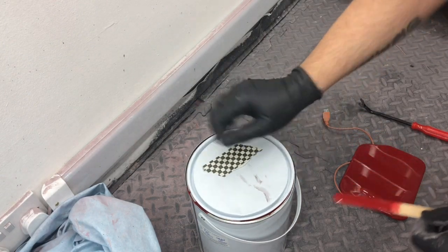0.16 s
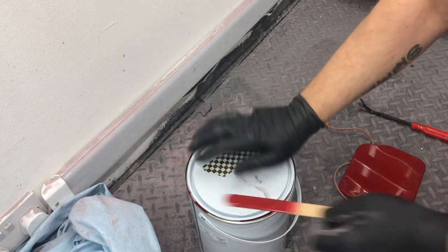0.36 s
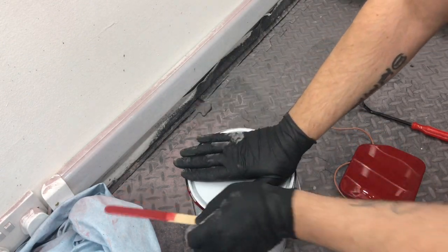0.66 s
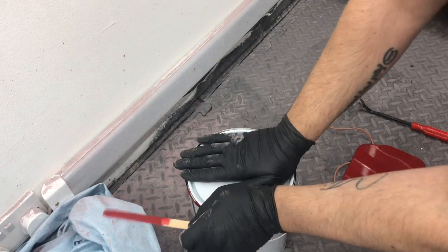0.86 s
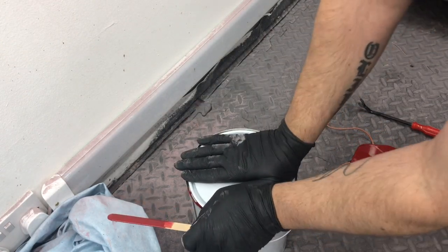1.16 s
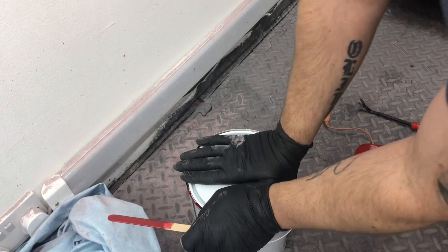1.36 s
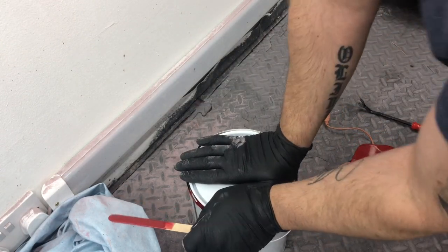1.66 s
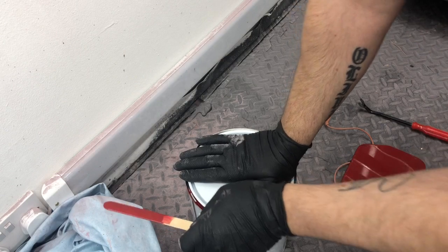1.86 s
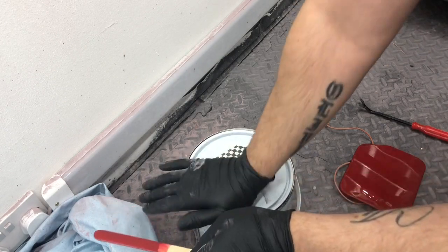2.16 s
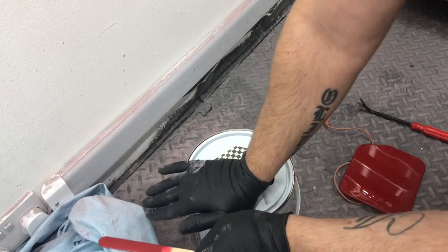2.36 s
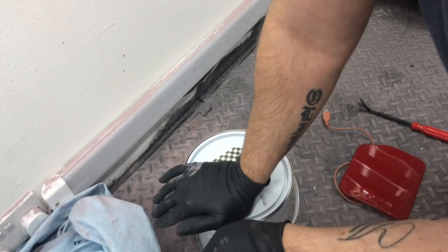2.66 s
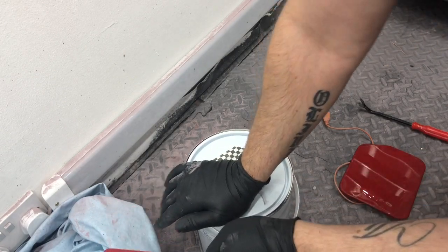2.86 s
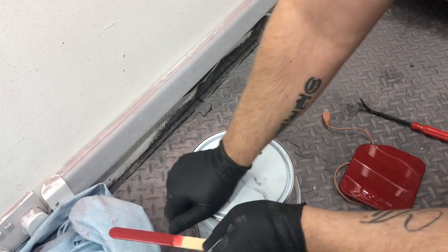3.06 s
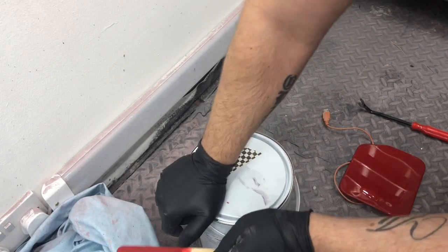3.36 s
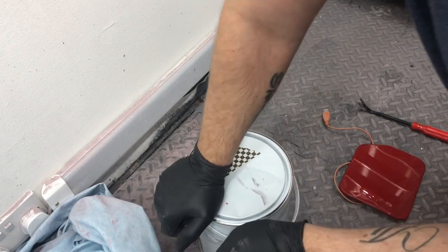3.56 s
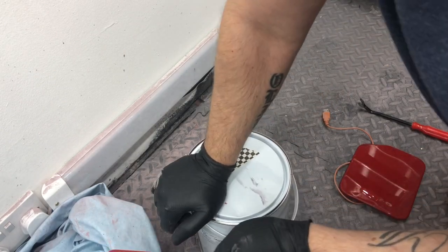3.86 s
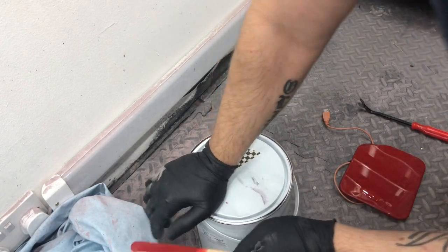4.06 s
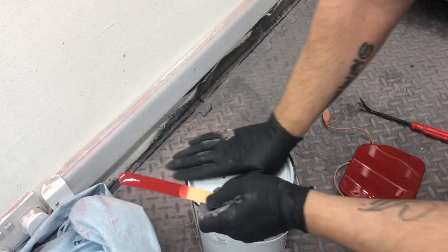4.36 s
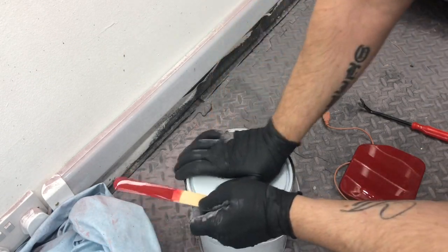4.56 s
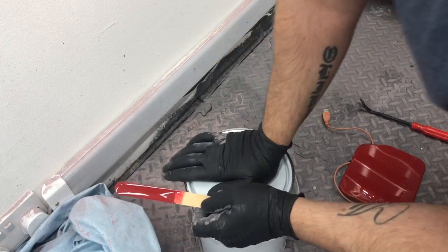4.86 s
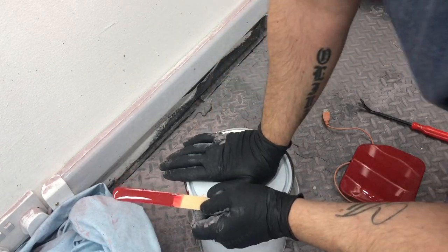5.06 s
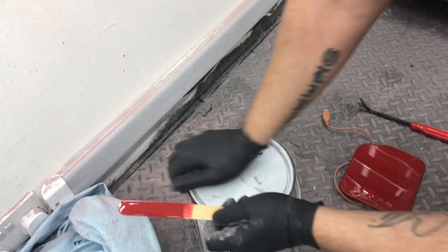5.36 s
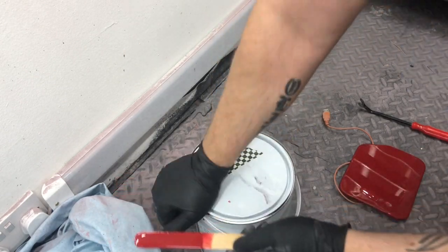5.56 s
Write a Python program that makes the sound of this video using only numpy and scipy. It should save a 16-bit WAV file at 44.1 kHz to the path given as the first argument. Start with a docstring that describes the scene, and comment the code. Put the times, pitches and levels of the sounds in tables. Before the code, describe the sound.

Close above a full paint tin on a garage floor, a rubber-gloved hand rubs and presses the lid. One sharp click-like knock comes early, then faint ticks and scuffs, a couple of dull double thumps, one loudest metallic bang, and lighter taps with squeaky rubbing. Short room echo, low hum and quiet steady noise beneath.

```python
"""Pressing home a paint tin lid

A gloved hand knocks and presses the lid of a full paint tin home on a garage floor.
Blows and light taps ring damped modes; dense random taps make chatter and faint tails after the blows.
Short grainy noise bursts make slips of the lip and small ticks of the glove, which also rubs as rasp and
hiss and squeaks as rough tones; the seal whistles faintly as wavering tones.
A low hum and steady room noise lie underneath; the garage echoes blows, chatter, bursts and squeaks.
"""
import sys
import numpy as np
from scipy import signal
from scipy.fft import rfft, irfft
from scipy.io import wavfile
from scipy.ndimage import uniform_filter1d

SR = 44100
rng = np.random.default_rng(int(sys.argv[2]) if len(sys.argv) > 2 else 0)


def int16_out(signal):
    """Quantize to a 16-bit WAV file."""
    q = np.round(np.clip(np.atleast_2d(signal).T, -1, 1) * 32767)
    wavfile.write(sys.argv[1], SR, q.astype(np.int16))


N = 251811  # length [samples]
T = np.arange(N) / SR  # time [s]


def from_db(db):
    """Decibels to gain."""
    return 10 ** (np.asarray(db) / 20)


def rms_one(x):
    """The same sound at unit RMS level."""
    return x / np.sqrt(np.mean(x ** 2) + 1e-20)


def in_time(rows):
    """Each column of an automation curve, read at every sample."""
    s, *columns = np.transpose(rows)
    return [np.interp(T, s, column) for column in columns]


def at_hz(points, hz):
    """Read a table on a log-frequency axis."""
    f, value = np.transpose(points)
    return np.interp(np.log(np.maximum(hz, 1)), np.log(f), value)


def coloured(x, spectrum):
    """Equalise a sound with a drawn spectrum; unit level."""
    freqs = np.fft.rfftfreq(len(x), 1 / SR)
    gain = from_db(at_hz(spectrum, freqs))
    return rms_one(irfft(rfft(x) * gain, len(x)))


def cut(x, hz, kind="low", order=2):
    """Butterworth filter."""
    return signal.sosfilt(signal.butter(order, hz, kind, fs=SR, output="sos"), x)


def drift(per_s):
    """Random control curve: normal draws of spread 1, per_s of them a second, joined by lines."""
    knots = rng.standard_normal(int(per_s * N / SR) + 2)
    return np.interp(T * per_s, np.arange(len(knots)), knots)


def add(out, s, sound):
    """Mix a sound in at a time, trimmed at the end of the scene."""
    start = round(s * SR)
    out[start:start + len(sound)] += sound[:N - start]


# low hum of the garage before trims: (time [s], level [dB], level of its octave [dB])
HUM_LEVELS = [(0.0, -56.5, -60), (.55, -57, -64), (.8, -80, -54), (2.25, -77, -51.5), (2.6, -54.5, -56),
              (2.93, -45.5, -69), (3.4, -58.5, -56.5), (5.7, -71, -58)]
# tone colour of the steady room noise: (frequency [Hz], relative level [dB])
AIR_SPECTRUM = [(15, -83), (25, -40), (39, -14), (63, -3), (92, -12), (127, -17), (149, -15.5), (236, -20),
                (270, -18.5), (405, -21.5), (600, -24), (1000, -21.5), (1450, -24), (2000, -29.5),
                (16000, -58)]
HUM_HZ, HUM_PHASE_DRIFT_PER_S = 57.7, 12
AIR_DB = -53


def background(hum_trim_db=-1, octave_trim_db=-4, flutter_db=3.5):
    """Steady coloured noise, and a hum and its octave that waver in phase and level."""
    hum_db, octave_db = in_time(HUM_LEVELS)
    phase = 2 * np.pi * HUM_HZ * T + drift(HUM_PHASE_DRIFT_PER_S)
    hum = rms_one(np.sin(phase) * from_db(flutter_db * drift(9.7)))
    octave = rms_one(np.sin(2 * phase) * from_db(flutter_db * drift(15.0)))
    air = from_db(AIR_DB) * coloured(rng.standard_normal(N), AIR_SPECTRUM)
    return from_db(hum_db + hum_trim_db) * hum + from_db(octave_db + octave_trim_db) * octave + air


# broad, quickly damped resonances of the rim: (frequency [Hz], width [Hz], level [dB])
RIM_RESONANCES = [(938, 570, 4.5), (1390, 880, 2.5), (1736, 162, 5), (2480, 540, 1.5), (2850, 375, 3.5),
                  (3114, 370, 2.5), (3930, 420, 2.5), (4870, 410, 1), (5320, 490, 1.5), (6800, 700, -0.5),
                  (8060, 720, -0.5), (9050, 1200, -0.5), (11600, 5000, -6), (15300, 1500, -1.5)]


def rim(x):
    """Pass a force through the rim: parallel resonators of alternating sign."""
    out = np.zeros(len(x))
    for k, (hz, width, db) in enumerate(RIM_RESONANCES):
        resonator = signal.iirpeak(hz, hz / width, fs=SR)
        out += (-1) ** k * from_db(db) * signal.lfilter(*resonator, x)
    return out


STROKE_CREST = 0.34  # the hand is fastest at this share of a stroke


def stroke(start, length):
    """Speed of the hand: it gathers, crests at 1 and comes to rest."""
    rise = np.interp(T, [start, start + STROKE_CREST * length, start + length], [0, 1, 0])
    return np.sin(np.pi / 2 * rise)


def patchy(x, depth_db, per_s):
    """Each third of an octave swells and fades on its own above a steady low end; unit level."""
    edges = np.geomspace(1000, 17000, 13)
    out = cut(x, edges[0])
    for band in zip(edges, edges[1:]):
        out += cut(x, band, "band", order=1) * from_db(depth_db * drift(per_s))
    return rms_one(out)


# strokes of the glove over the lid, levels at the crest:
# (start [s], length [s], rasp [dB], hiss [dB], fine top against the hiss [dB])
GLOVE_STROKES = [(0.247, 0.76, -74, -68.5, -3.5), (0.65, 2.9, -72, -69.5, -13),
                 (2.107, 0.13, -57, -59.5, -14), (2.223, 1.17, -77, -61.5, -22),
                 (2.913, 0.42, -62.5, -68, -5), (4.325, 0.15, -63, -65, 5),
                 (4.428, 0.36, -62.5, -58.5, -2.5), (4.492, 0.35, -61, -59.5, -1),
                 (5.097, 0.26, -63, -69.5, -3), (5.309, 0.11, -60, -57.5, -2), (5.412, 0.25, -62, -71, 2)]
# tone colour of the sliding rubber: (frequency [Hz], relative level [dB])
HISS_SPECTRUM = [(1500, 6.5), (3500, -12.5), (5500, -0.5), (8000, -5.5), (11000, -9), (16000, -13.5)]
RESTING_RASP_DB, RESTING_HISS_DB = -88, -77  # a hand at rest still creeps
RASP_LOW_HZ, RASP_HIGH_HZ = 2200, 4970
SHEEN_HZ = 9700  # a fast, flat palm adds a fine top to the hiss above this


def glove(catch_db=1.0, patch_db=6.0, patches_per_s=70, scuff_db=-0.05, grain_db=5):
    """Rubber catches and lets go: a grainy rasp in the rim under a hiss whose colour keeps shifting."""
    rasp_gain, hiss_gain, sheen_gain = from_db(RESTING_RASP_DB), from_db(RESTING_HISS_DB), 0
    for start, length, rasp_db, hiss_db, sheen_db in GLOVE_STROKES:
        speed = stroke(start, length)
        # overlapping strokes add in power
        rasp_gain = np.hypot(rasp_gain, speed * from_db(rasp_db))
        hiss_gain = np.hypot(hiss_gain, speed * from_db(hiss_db))
        sheen_gain = np.hypot(sheen_gain, speed * from_db(hiss_db + sheen_db))
    jolt_noise, hiss_noise, sheen_noise, grain = rng.standard_normal((4, N))
    jolts = jolt_noise * from_db(grain_db * grain)
    jolts = cut(jolts, RASP_LOW_HZ, "high", order=1)
    jolts = cut(jolts, RASP_HIGH_HZ, order=4)
    rasp = rasp_gain * rms_one(rim(jolts)) * from_db(catch_db * drift(150))
    hiss = hiss_gain * patchy(coloured(hiss_noise, HISS_SPECTRUM), patch_db, patches_per_s)
    sheen = sheen_gain * rms_one(cut(sheen_noise, SHEEN_HZ, "high", order=3))
    return (rasp + hiss + sheen) * from_db(scuff_db * drift(46))


# slips of the lip and small ticks of the glove, level before the rim:
# (time of peak [s], level [dB], fade time constant [s], low-pass cut-off [Hz])
SLIPS_AND_TICKS = [(0.564, -51.5, 0.0028, 12000), (0.585, -42.5, 0.0016, 14200), (.801, -45.5, 0.001, 4940),
                   (1.6024, -18.5, 0.0023, 12000), (1.933, -44, 0.006, 7060), (1.943, -43, 0.0039, 9100),
                   (1.978, -54, 0.015, 14100), (2.021, -45, 0.0046, 14000), (2.275, -49.5, 0.0016, 8000),
                   (2.329, -49.5, 0.0025, 9100), (2.397, -48, 0.0025, 8050), (2.459, -56, 0.0014, 9000),
                   (2.535, -47, 0.002, 5000), (2.562, -48, 0.002, 5000), (2.624, -46, 0.0016, 7000),
                   (2.5045, -41, 0.0011, 7000), (2.678, -30.5, 0.0013, 5900), (3.049, -42.5, 0.0037, 5060),
                   (3.062, -42.5, 0.0021, 5000), (3.198, -43.5, 0.0019, 11600),
                   (3.595, -24.5, 0.0062, 10200), (3.724, -29, 0.0021, 11900), (4.1221, -20, 0.0039, 3200),
                   (4.181, -55, 0.016, 14000), (4.323, -55.5, 0.0057, 13000), (4.341, -48, 0.0025, 6000),
                   (4.35, -46, 0.0023, 6000), (4.367, -58, 0.0044, 10000), (4.474, -41.5, 0.047, 2470),
                   (4.831, -42, 0.0013, 14200), (4.8743, -38, 0.0026, 13000), (4.885, -37.5, 0.0015, 12300),
                   (4.9432, -19, 0.0016, 12500), (5.0566, -34.5, 0.0011, 4740), (5.285, -43, 0.0019, 12500)]
BURST_SWELL = 0.47  # a burst builds up in this share of its fade


def slips_and_ticks(grain_db=3.0, rim_db=6):
    """Slips of the lip and ticks of the glove: short grainy noise bursts swell, fade and ring the rim."""
    force, lead = np.zeros(N), SR // 25
    t = T[:SR // 6] - lead / SR  # zero at the peak
    for s, level_db, fade, bright_hz in SLIPS_AND_TICKS:
        size, jolt = rng.standard_normal((2, len(t)))
        envelope = np.exp(np.minimum(t / (BURST_SWELL * fade), -t / fade))
        burst = rms_one(jolt * from_db(grain_db * size)) * envelope
        add(force, s - lead / SR, from_db(level_db) * cut(burst, bright_hz, order=3))
    return from_db(rim_db) * rim(force + 1e-18)  # the tiny offset is inaudible


def mode(t, hz, t60):
    """A struck resonance: a sine that dies away by 60 dB in t60."""
    return np.sin(2 * np.pi * hz * t) * np.exp(-np.log(1000) * t / t60)


# blows, closely following contacts and light taps on the lid:
# (time [s], force [dB], contact cut-off [Hz], body thud [dB],
# first panel mode [Hz], its level [dB], second panel mode [Hz], its level [dB], ring length [ratio])
CONTACTS = [(1.6012, -26, 2305, -2, 947, 24.5, 175, 14, 0.3),
            (1.6024, -30, 4300, 8, 1720, 28, 3670, 28, 0.32),
            (2.503, -45, 5000, 3, 2520, 22, 5730, 13, 0.72),
            (2.6791, -33, 3000, -1.5, 886, 17.5, 426, 12.5, 0.41),
            (3.5941, -23.5, 1240, -1, 1288, 13, 964, 7, .62), (3.5993, -21, 852, 3, 383, 12.5, 259, 8, 0.7),
            (3.6095, -26, 925, -2, 760, 7.5, 285, 9, 0.69),
            (3.7242, -27.5, 1580, -3, 817, 16, 1396, 18.5, 0.9),
            (3.7514, -23, 896, 0.5, 691, 12, 1064, 7, 0.56),
            (3.7584, -28.5, 910, 10, 357, 8.5, 540, 10, 0.5),
            (3.766, -30.5, 1088, 5, 779, 13, 1100, 13, 0.56),
            (4.1197, -11, 1600, -4.5, 534, 16.5, 754, 11.5, 0.61),
            (4.123, -16.5, 2936, 3, 1255, 19, 2780, 16, 0.54),
            (4.127, -18, 1841, 5, 920, 14, 244, 10.5, 0.43),
            (4.32, -46, 2502, -10.5, 2360, 13, 330, 7.5, .5),
            (4.339, -38, 1800, -7, 1070, 11, 334, 9.5, .33), (4.35, -45, 1800, -7, 950, 4, 318, 13.5, .5),
            (4.362, -47, 2500, -8, 2380, 17, 375, 11, 0.57),
            (4.415, -49, 2580, -6, 1300, 18, 1700, 9, 0.45),
            (4.4431, -42, 2600, 0, 1270, 13.5, 990, 16, 0.18),
            (4.466, -41.5, 3200, 0, 1620, 16.5, 2370, 3, 0.94), (4.721, -42.5, 546, 9, 274, 4, 460, 6, .41),
            (4.7518, -27.5, 597, 7.5, 280, 7, 710, -1, 0.43),
            (4.874, -46, 550, 4.5, 262, 10.5, 432, -5, 0.46),
            (4.9433, -30.5, 3280, 3, 960, 25, 2260, 19, 0.26),
            (5.2853, -27, 1280, 8, 416, 17.5, 699, 17.5, .8),
            (5.2866, -25.5, 2370, -3, 754, 22, 1300, 16.5, 0.18)]
# modes of the tin and its lid at ring length 1: (frequency [Hz], level [dB], t60 [s])
TIN_MODES = [(114, -21, .3), (177, -11.5, .24), (261, -6.5, .16), (310, -16, .2), (417, -9.5, .22),
             (535, -6, .19), (630, -8, .16), (770, -7.5, .16), (830, -12, .16), (903, -12.5, .14),
             (1019, -11, .14), (1123, -15, .13), (1192, -12, .12), (1265, -13, .12), (1392, -9.5, .14),
             (1640, -17, .13), (1705, -19, .11), (1866, -15, .15), (2205, -18.5, .12), (2536, -17, .1),
             (2750, -13.5, .1), (2907, -18, .09)]
PANEL_DB, PANEL_CYCLES = -10.0, 57.5  # free patch of lid; swings in its t60 at ring length 1
THUD_HZ, THUD_T60_S, THUD_DB = 125.4, 0.068, -6  # the heavy, paint-filled body
TIN_LOW_CUT_HZ = 105  # so small a tin radiates no deep bass
CANCEL_HZ, CANCEL_WIDTH_HZ = 206, 8.9  # an echo from the floor cancels this pitch


def knocks(scatter_db=2.5):
    """Each blow, following contact or light tap rings the tin, its heavy body and the free patch of lid."""
    out, t = np.zeros(N), T[:SR // 3]
    draws = rng.standard_normal((len(CONTACTS), len(TIN_MODES)))
    for contact, strength in zip(CONTACTS, draws):
        s, force_db, contact_hz, thud_db, first_hz, first_db, second_hz, second_db, ring = contact
        sound = from_db(THUD_DB + thud_db) * mode(t, THUD_HZ, THUD_T60_S)
        # every contact lands a little differently, so each mode starts with its own strength
        for k, (hz, db, t60) in enumerate(TIN_MODES):
            sound += (-1) ** k * from_db(db + scatter_db * strength[k]) * mode(t, hz, ring * t60)
        for sign, hz, db in [(1, first_hz, first_db), (-1.03, second_hz, second_db)]:
            sound += sign * from_db(PANEL_DB + db) * mode(t, hz, ring * PANEL_CYCLES / hz)
        # a soft palm cannot drive the high modes
        add(out, s, from_db(force_db) * cut(sound, contact_hz, order=3))
    notch = signal.iirnotch(CANCEL_HZ, CANCEL_HZ / CANCEL_WIDTH_HZ, fs=SR)
    out = signal.lfilter(*notch, out + 1e-18)
    return cut(out, TIN_LOW_CUT_HZ, "high", order=4)


# chatter and faint tails after the blows: (time of peak [s], level [dB], swell time constant [s],
# fade time constant [s], low cut [Hz], high cut [Hz])
CHATTER_AND_TAILS = [(1.605, -28.5, 0.0018, 0.0093, 865, 5140), (1.607, -33, 0.0014, 0.03, 220, 510),
                     (3.597, -36.5, 0.0066, 0.022, 620, 1450), (3.726, -34.5, .0021, 0.0049, 1000, 1600),
                     (3.761, -29, 0.0095, 0.013, 288, 1090), (4.1215, -23, .0012, 0.027, 670, 1490),
                     (4.125, -26.5, 0.0026, 0.01, 1380, 3050), (4.945, -45.5, .001, .059, 1270, 1600),
                     (5.288, -32, .001, 0.013, 520, 1500)]
TAPS_PER_S = 2900  # on average


def chatter_and_tails(uneven_db=-0.5):
    """Chatter and faint tails after the blows: band-limited bursts of dense random taps swell and die."""
    out, lead = np.zeros(N), SR // 25
    t = T[:SR // 4] - lead / SR  # zero at the peak
    for s, level_db, swell, fade, low_hz, high_hz in CHATTER_AND_TAILS:
        touches = rng.random(len(t)) < TAPS_PER_S / SR
        signs = rng.choice([-1, 1], len(t))
        taps = touches * signs * from_db(uneven_db * rng.standard_normal(len(t)))
        burst = rms_one(cut(cut(taps, low_hz, "high", order=3), high_hz, order=6))
        envelope = np.exp(np.minimum(t / swell, -t / fade))
        add(out, s - lead / SR, from_db(level_db) * burst * envelope)
    return out


# the glove squeaking on the lid:
# (start [s], length [s], starting pitch [Hz], glide over the squeak [Hz], level [dB])
GLOVE_SQUEAKS = [(1.926, .024, 4000, 0, -54), (1.932, .018, 6140, 0, -60), (2.11, .09, 4000, -100, -63),
                 (4.314, .032, 4030, -270, -52), (4.338, .016, 4700, 0, -57), (4.36, .017, 4520, 400, -51),
                 (4.399, .1, 4440, -150, -60), (4.472, .078, 3870, -100, -56),
                 (4.544, .084, 3900, 156, -60)]


def squeaks(jitter=.055, flicker_db=3.5):
    """Rubber sticks and slips fast enough to give a rough tone, steady or gliding."""
    out = np.zeros(N)
    unsteady, grip = 1 + jitter * drift(1500), from_db(flicker_db * drift(180))
    for start, length, pitch_hz, glide_hz, level_db in GLOVE_SQUEAKS:
        progress = np.clip((T - start) / length, 0, 1)
        hz = (pitch_hz + glide_hz * progress) * unsteady
        phase = 2 * np.pi * np.cumsum(hz) / SR
        out += from_db(level_db) * stroke(start, length) * grip * np.sin(phase)
    return out


# air squeezing through the seal, one pitch curve for each whistle: (time [s], pitch [Hz])
SEAL_WHISTLES = [
    [(2.078, 11300), (2.1, 12200), (2.13, 12750), (2.17, 12450), (2.2, 11500), (2.235, 9700)],
    [(5.118, 12100), (5.135, 12700), (5.16, 12660), (5.203, 13600), (5.232, 12900), (5.265, 12900),
     (5.29, 12050), (5.316, 11500)],
    [(5.447, 11850), (5.475, 12300), (5.515, 12750), (5.542, 11850), (5.575, 11800), (5.6, 11250),
     (5.655, 10100)],
]
WHISTLE_DB = -67


def seal(waver=.005, flutter_ratio=.125, flutter_depth=0.33, flicker_db=3.5):
    """Thin whistles of rising and sinking pitch; the fluttering gap adds faint side tones."""
    out = np.zeros(N)
    for curve in SEAL_WHISTLES:
        hz, = in_time(curve)
        gate = 1.0 * ((T > curve[0][0]) & (T < curve[-1][0]))
        sounding = uniform_filter1d(gate, size=400)  # soft edges
        unsteady = 1 + waver * (drift(2000) + drift(70))
        phase = 2 * np.pi * np.cumsum(hz * unsteady) / SR
        tone = np.sin(phase + flutter_depth * np.sin(flutter_ratio * phase))
        out += sounding * from_db(WHISTLE_DB + flicker_db * drift(60)) * tone
    return out


def lingering(db, t60):
    """Energy of echoes over time: it totals db and dies away by 60 dB in t60."""
    energy = np.exp(-2 * np.log(1000) * T[:SR * 3 // 4] / t60)
    return from_db(db) ** 2 * energy / energy.sum()


# garage reverberation: (frequency [Hz], t60 [s])
GARAGE_T60 = [(120, 0.23), (400, 0.46), (1200, 0.31), (4000, 0.3), (8000, 0.3), (13000, 0.11)]
DENSE_ECHO_HZ = 3000  # bands centred here and above blur into smooth noise


def garage(x, near_db=-14, near_t60=0.018, far_db=-12, gap_s=.004):
    """Quick scatter from floor and wall, then the room; treble echoes blur into smooth noise."""
    echoes, edges = np.zeros(N), np.geomspace(90, 17000, 13)
    for band in zip(edges, edges[1:]):
        hz = np.sqrt(np.prod(band))
        noise = cut(rng.standard_normal(N), band, "band")
        energy = lingering(near_db, near_t60) + lingering(far_db, at_hz(GARAGE_T60, hz))
        if hz < DENSE_ECHO_HZ:
            response = noise[-len(energy):] * np.sqrt(energy)
            wet = signal.fftconvolve(x, response)
        else:
            # noise that follows the smeared power of the sound in this band
            power = signal.fftconvolve(cut(x, band, "band") ** 2, energy)[:N]
            wet = rms_one(noise) * np.sqrt(abs(power))
        add(echoes, gap_s, wet)
    return x + echoes


def scene():
    """The tin in the garage, heard from just above: glove rub, seal and background stay dry."""
    echoing = slips_and_ticks() + knocks() + chatter_and_tails() + squeaks()
    return (background() + glove() + garage(echoing) + seal())[None]


CUTOFF_HZ = 16200


def record(dry):
    """The top is cut steeply by an elliptic low-pass."""
    return signal.sosfilt(signal.ellip(10, .1, 90, CUTOFF_HZ, fs=SR, output="sos"), dry)


dry = scene()
out = record(dry)
int16_out(out)
```